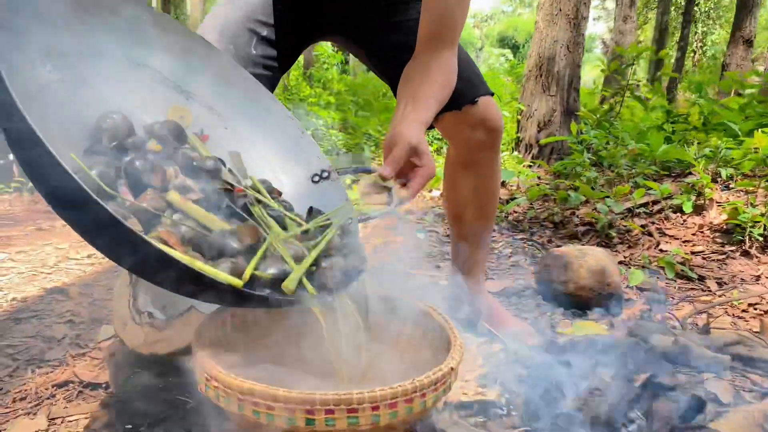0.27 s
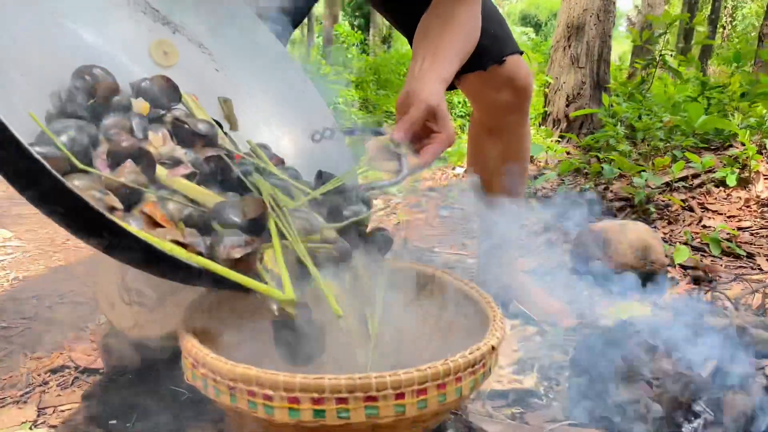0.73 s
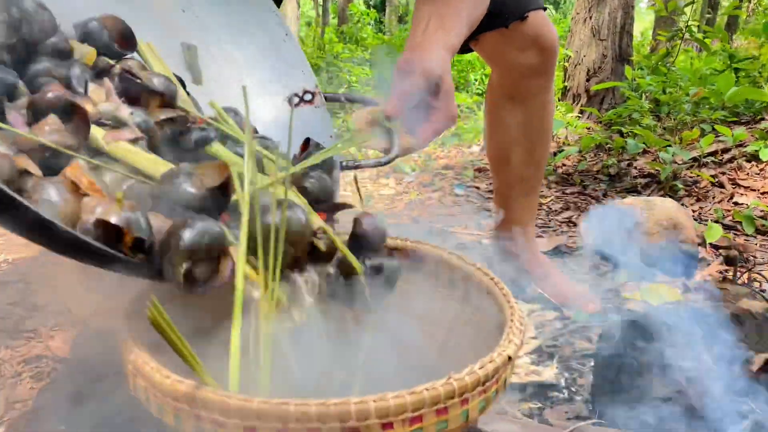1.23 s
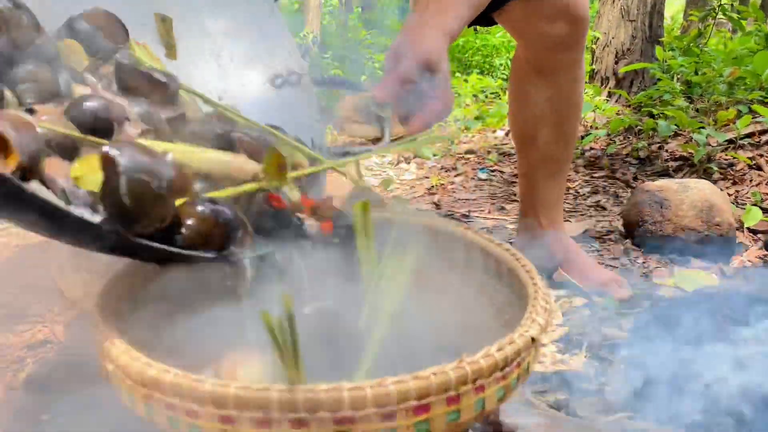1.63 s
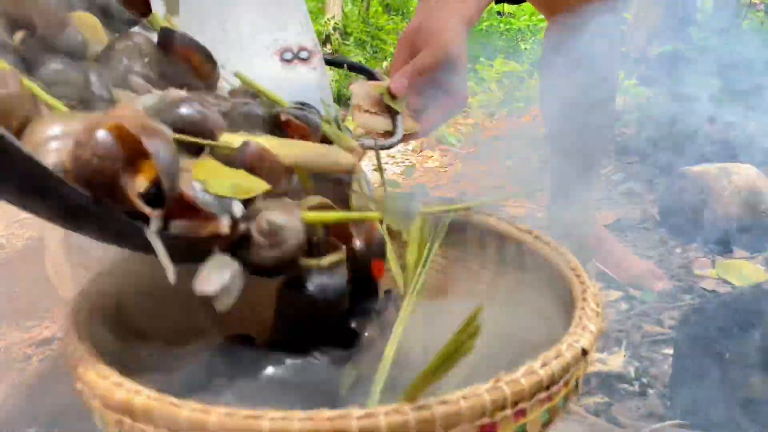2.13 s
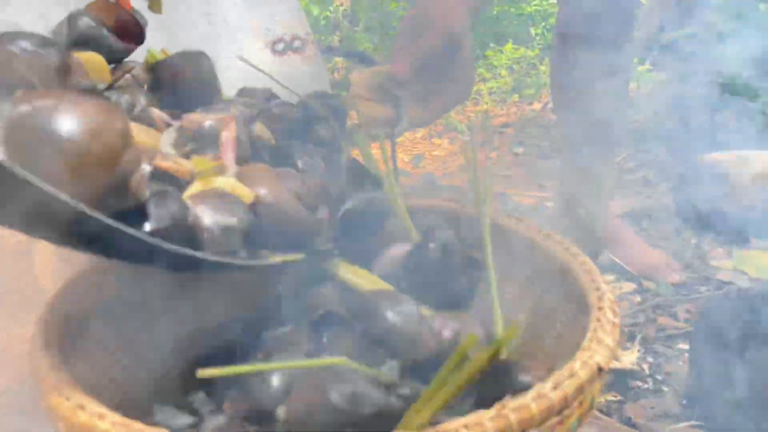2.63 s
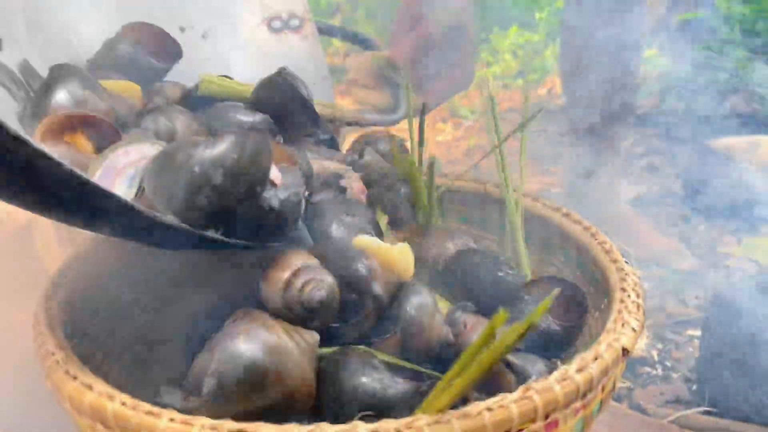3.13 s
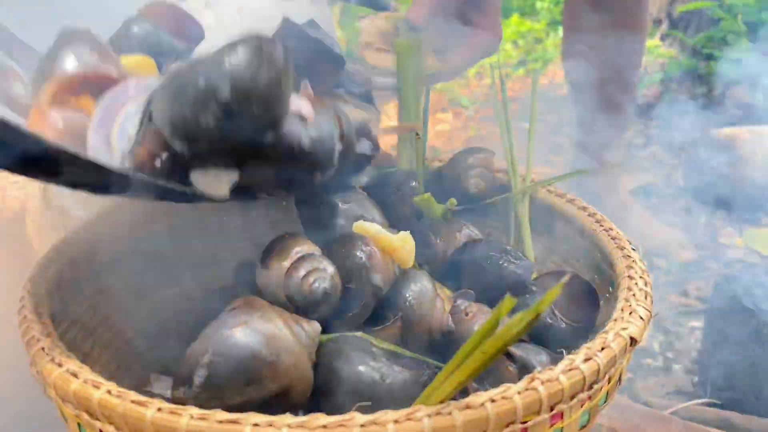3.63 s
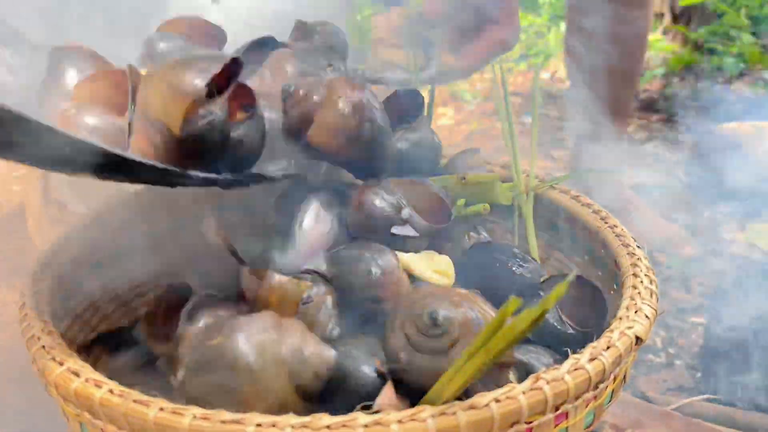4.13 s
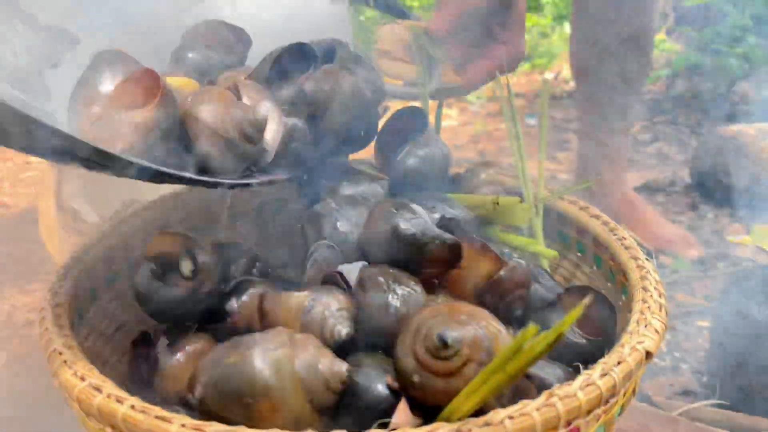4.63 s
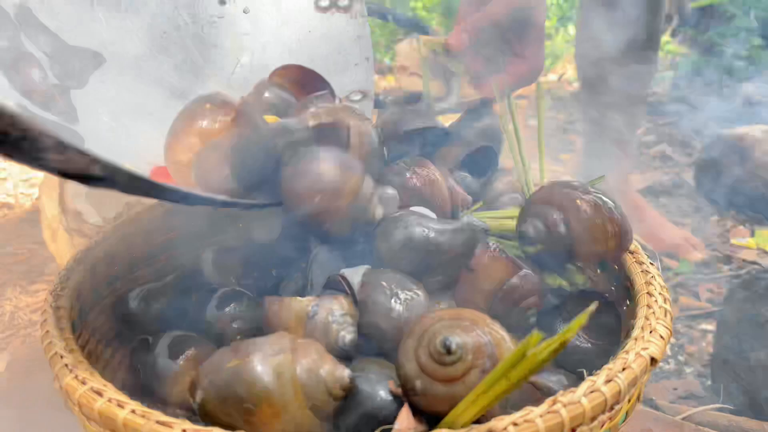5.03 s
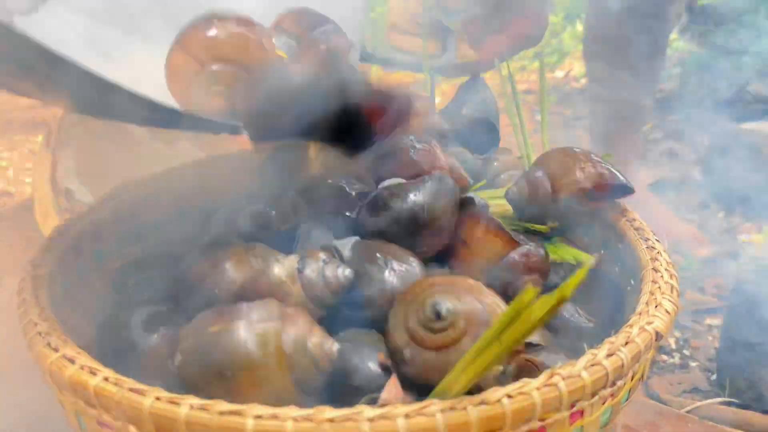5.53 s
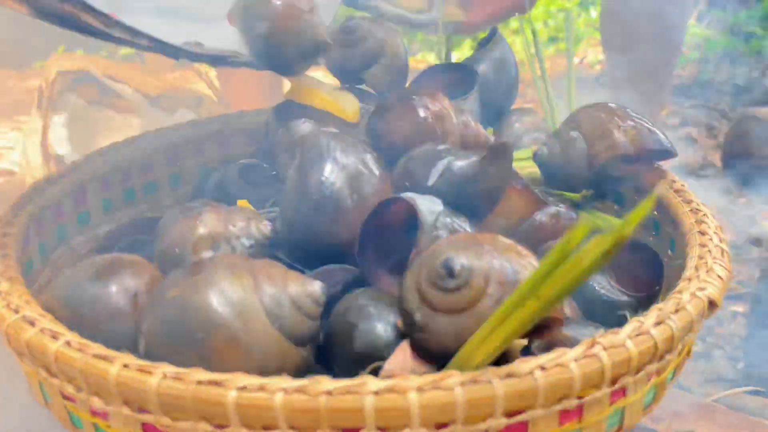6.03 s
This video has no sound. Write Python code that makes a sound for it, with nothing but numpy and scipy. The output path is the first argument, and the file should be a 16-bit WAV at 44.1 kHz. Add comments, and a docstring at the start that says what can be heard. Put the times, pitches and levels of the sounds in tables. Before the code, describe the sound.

Close, dry stereo sound of cooked snail shells being tipped from a metal pan into a woven basket in a wood. At first there is soft broth hiss, light knocks, a very faint metallic pan ring and, around 0.2-0.35 s, one thin rising bird chirp. Firmer hollow clacks begin at 0.55-0.8 s, with low wind puffs until about 2.1 s. A loud cluster tumbles at 1.35-1.75 s while the liquid hiss swells, then strong sliding rushes come at 2.1 and 2.8 s, with busy clatter between. It thins from 3.0 to 3.6 s, bursts sharply at 3.65 s, then rattles on more lightly. Further knocks come at 4.5, 4.85 and 5.0-5.2 s, and brisk clatter from 5.45 to 5.95 s. The knocks turn drier and less boomy as the basket fills, ending with small settling clicks and a last clack near 6.26 s.

```python
"""Cooked snail shells are tipped from a metal pan into a woven basket in a wood.
Each knock is a set of dying resonances and grit; bursts of treble tick alone or on top of knocks.
The heap rattles, and at times slides in a rush, as random contacts ring many resonances.
Broth and steam hiss as shaped noise, wind rumbles as low noise on two spaced microphone ports.
The pan rings at first as narrow wavering noise, and a bird chirps once, a rising sine."""
import sys
import numpy as np
from scipy import signal
from scipy.fft import rfft, irfft
from scipy.io import wavfile

SR = 44100
rng = np.random.default_rng(int(sys.argv[2]) if len(sys.argv) > 2 else 0)


def int16_out(signal):
    """Quantize to a 16-bit WAV file."""
    q = np.round(np.clip(np.atleast_2d(signal).T, -1, 1) * 32767)
    wavfile.write(sys.argv[1], SR, q.astype(np.int16))


def convert_level_to_amplitude(level_db):
    """Map a level in decibels to its linear amplitude factor."""
    exponent = np.asarray(level_db, float) / 20
    return 10 ** exponent


N = 276507

# Restlessness of the heap. Each row: time in seconds, rattle level in dB.
HEAP_RATTLE = [(0, -66), (.44, -57.5), (.7, -44.5), (.85, -75), (1.13, -55), (1.3, -37), (1.55, -51),
               (1.69, -45), (1.9, -63), (2.15, -34), (2.45, -45), (2.58, -40), (2.7, -43.5), (3.1, -42),
               (3.2, -66), (3.5, -70), (3.8, -42.5), (4.19, -44), (4.33, -59), (4.4, -38), (4.55, -35),
               (4.68, -58), (4.8, -34.5), (4.94, -37.5), (5.06, -51), (5.14, -36), (5.26, -56.5),
               (5.43, -59), (5.5, -31), (5.64, -49.5), (5.8, -61), (6.01, -36), (6.15, -59), (6.27, -53)]
# Tone of shell on shell. Each row: frequency in Hz, relative level in dB per Hz.
SHELL_COLOUR = [(150, -15), (300, -19), (650, -14), (900, -7), (1500, -5), (2700, -8), (5000, -8),
                (8500, -7), (11000, -7.5), (17000, -12)]
# Broth running through the weave and steaming. Each row: time in seconds, level in dB.
BROTH_LEVEL = [(0.0, -49), (1.1, -46), (1.6, -37.5), (1.95, -49), (2.25, -39), (3.0, -41.5), (3.3, -52.5),
               (3.85, -47.5), (4.26, -52.5), (5.0, -46), (5.35, -56), (6.27, -52)]
# Tone of broth and steam. Each row: frequency in Hz, relative level in dB per Hz.
HISS_COLOUR = [(90, -34), (150, -6), (560, -13.5), (1900, -14), (3500, -16.5), (6800, -23), (8800, -33.5),
               (11000, -26.5), (17000, -18)]
# Wind strength. Each row: time in seconds, level in dB.
GUST_LEVEL = [(0.0, -52), (0.35, -53), (0.79, -40), (0.8, -44.5), (1.83, -45.5), (1.92, -58), (2.09, -48),
              (2.13, -57), (6.22, -53), (6.27, -52)]
# Tone of the wind. Each row: frequency in Hz, relative level in dB per Hz.
WIND_COLOUR = [(12, -32), (20, -7), (54, 5.5), (82, 3.5), (112, 2), (161, -11.5), (300, -13.5), (390, -5.5),
               (660, -120)]
# Short puffs of wind. Each row: centre in seconds, level in dB.
WIND_PUFFS = [(.77, -36), (1.24, -36), (1.62, -40), (1.71, -37), (1.82, -43), (1.99, -47.5), (2.08, -40),
              (2.85, -49), (3.07, -49), (3.65, -55), (4.35, -54), (4.47, -58), (4.7, -59), (5.26, -55),
              (5.5, -51), (5.59, -46), (5.83, -52), (6.16, -49.5)]
# Sheet metal of the pan. Each row: frequency in Hz, starting level in dB, t60 in seconds.
PAN_MODES = [(1100, -50, .8), (2550, -51, .8)]
# Single shell knocks. Each row: start in seconds, peak level of the wall in dB, cavity pitch in Hz,
# wall pitch in Hz, cavity level relative to the wall in dB.
SHELL_KNOCKS = [(0.0055, -30, 1080, 2520, -27), (0.033, -31, 1130, 2310, -27),
                (0.183, -31, 1450, 5030, -12), (0.196, -24.5, 1450, 1680, -3),
                (0.2482, -34.5, 1520, 1700, 6), (0.2665, -39, 490, 1730, 1), (0.285, -23.5, 1600, 1730, -5),
                (0.3038, -21.5, 1580, 1740, -1.5), (0.5485, -19, 1160, 2040, 3),
                (0.553, -20, 1110, 2120, -3), (0.5903, -24, 476, 2020, -1.5), (0.602, -22, 1100, 4370, -16),
                (0.6175, -9, 1490, 2120, -14), (0.6258, -17, 1530, 2000, -4), (0.64, -38.5, 446, 2000, 12),
                (0.68, -28.0, 1000, 2270, -0.5), (0.7276, -46.5, 1050, 3330, 17),
                (0.7685, -26.5, 820, 3350, -15), (0.7757, -18.5, 1380, 4520, -10),
                (0.7896, -27, 470, 2980, 0.5), (0.852, -47.5, 1080, 2880, 14),
                (0.8779, -37, 1030, 1870, 11.5), (0.9575, -18.5, 1430, 1800, -8),
                (1.0323, -20.5, 887, 4900, 1.5), (1.0623, -21.5, 1520, 1840, -2),
                (1.1, -23, 630, 2080, -11), (1.1816, -13.5, 900, 2370, -19),
                (1.1924, -16.5, 1230, 2420, -20), (1.2261, -9.5, 1235, 3300, -9),
                (1.2846, -25, 1040, 3500, -4), (1.311, -20.5, 830, 4020, -0.5),
                (1.3518, -2.5, 1620, 2910, -3.5), (1.3636, -9, 1200, 2980, -7),
                (1.3713, -7, 1210, 3200, -11), (1.379, -7, 1320, 2980, -4.5),
                (1.389, -7.5, 1260, 5000, -11), (1.4094, -16.5, 1240, 4950, 7),
                (1.4153, -7, 1220, 4800, -15), (1.425, -19, 1050, 1830, 7), (1.4763, -8.5, 1265, 2260, 2.5),
                (1.4915, -10, 990, 3740, -26), (1.5247, -20, 1210, 1770, 3), (1.5498, -19, 805, 1710, 2),
                (1.5523, -25.5, 830, 1750, 3.5), (1.577, -26.0, 864, 1960, 5.5),
                (1.5998, -2.5, 1394, 4360, -10.5), (1.608, -12.5, 830, 4380, -16),
                (1.6303, -13.5, 840, 2680, -4), (1.6372, -21, 828, 1720, 4), (1.6428, -16.5, 830, 3440, -1),
                (1.6548, -14.5, 1210, 1950, 0.5), (1.6647, -6, 1170, 2085, -11.5),
                (1.7002, -18.5, 1170, 1910, -6), (1.7215, -19, 855, 1720, 0),
                (1.7374, -20.5, 1220, 1700, 1.5), (1.7598, -6, 1317, 2710, -5.5),
                (1.7651, -21, 1280, 2050, -10), (1.803, -13.0, 1270, 2380, -6),
                (1.8081, -28, 1280, 2700, 11), (1.8165, -19, 1260, 2680, -4), (1.8492, -27, 890, 3460, -1),
                (1.8627, -12, 1600, 3120, -16), (1.8739, -28, 1600, 3150, -14),
                (1.8932, -25, 624, 3860, -6), (1.9386, -29, 1180, 2730, -5),
                (1.9941, -23.0, 1460, 1750, -11), (2.0671, -7, 1230, 1880, -4), (2.085, -3, 1134, 2380, -4),
                (2.0925, -6, 1200, 2350, -7), (2.1078, -10, 1205, 2400, -2),
                (2.1426, -12.5, 1220, 2080, -15), (2.157, -25, 1174, 2380, -1),
                (2.177, -24.5, 1150, 3480, -2), (2.2061, -17.5, 1180, 2400, -10),
                (2.2379, -13, 1220, 2370, 0.5), (2.2569, -12.5, 1410, 3040, -14),
                (2.265, -11, 1420, 2970, -24), (2.2731, -3.5, 1180, 3260, -15),
                (2.2902, -15.5, 1220, 2340, -7), (2.3013, -18, 1350, 2330, -8),
                (2.337, -21.5, 670, 2540, -7.5), (2.3446, -19.5, 774, 1720, 3),
                (2.3748, -12.5, 1440, 2420, -9), (2.3825, -14.5, 1600, 2260, -2.5),
                (2.411, -20, 1310, 2690, -6), (2.421, -14.5, 1090, 2380, -5), (2.4361, -17, 1086, 3200, 2),
                (2.441, -11.5, 1340, 3260, -16), (2.458, -11, 1010, 3520, -17),
                (2.4866, -16.0, 770, 2030, -22), (2.4973, -18, 1080, 2720, -20),
                (2.5053, -18, 1580, 2710, -18), (2.513, -20.5, 1460, 3210, -19),
                (2.5451, -18.5, 980, 2260, -12), (2.5658, -20, 1070, 2830, -6),
                (2.5696, -18.5, 1000, 2830, -4), (2.5796, -17, 1000, 2780, -13),
                (2.6245, -10, 1090, 4080, -30), (2.6392, -20, 1460, 2070, -15),
                (2.674, -19.0, 1100, 2530, -18), (2.7382, -26, 1450, 3860, -25),
                (2.7793, -23.5, 1100, 3840, -5), (2.8038, -17.5, 1040, 3090, -1),
                (2.8182, -8.0, 1060, 2370, -1.5), (2.8264, -2.5, 1053, 2250, -2.5),
                (2.8405, -2.5, 1030, 2410, -11), (2.8447, -0.5, 1040, 2680, -13),
                (2.862, -15, 1230, 1830, -13), (2.8682, -12, 1200, 1900, -8), (2.887, -15, 1250, 1930, -7),
                (2.9138, -19, 1510, 3980, -15), (2.9721, -12, 1500, 2520, -29),
                (2.995, -27, 823, 3930, 0.5), (3.02, -21.5, 800, 3470, -12), (3.0386, -15, 1395, 1720, 1.5),
                (3.0606, -20.5, 713, 2350, -5), (3.1165, -19.5, 1580, 2510, -9),
                (3.131, -16, 1020, 2470, -11), (3.189, -25.5, 1600, 2900, -12),
                (3.1996, -24, 1600, 2190, -21), (3.2746, -19, 760, 2150, -11), (3.32, -37, 1600, 2940, -14),
                (3.4518, -23.5, 1020, 2750, -8), (3.4833, -28.5, 1600, 2350, -14),
                (3.6113, -20.5, 1160, 2350, -13), (3.6286, -15, 1060, 3070, -7),
                (3.6411, -1.0, 1170, 2700, -14), (3.6524, -8, 684, 2330, -14),
                (3.659, -10.5, 750, 2626, -24), (3.6696, -31, 1030, 2790, -18),
                (3.689, -10.5, 1080, 2900, -33), (3.7057, -23, 1440, 2510, -12),
                (3.754, -26.5, 970, 1770, -1), (3.7768, -18.5, 760, 2500, -10),
                (3.791, -20, 1120, 2820, -10), (3.8137, -18, 766, 2690, -20), (3.8305, -21, 760, 3600, -18),
                (3.8655, -11.5, 1160, 2620, -25), (3.8727, -19, 1170, 3640, -8),
                (3.8774, -15.5, 1600, 3620, -20), (3.8997, -20.5, 1030, 2700, -23),
                (3.9233, -19.5, 1020, 3650, -35), (3.9554, -26, 1070, 2700, -15),
                (3.9806, -15.0, 880, 2800, -16.5), (4.0049, -22, 1030, 3080, -25),
                (4.024, -20.5, 1420, 2140, -16), (4.0607, -13, 1620, 2030, -2),
                (4.078, -18, 1600, 3980, -7), (4.0944, -13.5, 830, 4450, -14),
                (4.1065, -21, 1210, 1950, -17), (4.134, -27.5, 1000, 4330, -6),
                (4.1556, -26.5, 1560, 3360, -1), (4.1594, -21.5, 1390, 2940, 0),
                (4.2027, -27, 1270, 3870, -4), (4.2367, -31, 1000, 2400, -5), (4.2695, -35.5, 820, 3580, 1),
                (4.3346, -31, 1450, 4880, -8), (4.3509, -34.0, 820, 3840, 0), (4.3911, -24, 760, 2310, -9),
                (4.4147, -16.5, 1160, 3770, -21), (4.4426, -29, 1420, 4600, -22),
                (4.473, -20.5, 800, 2710, -22), (4.4958, -16, 1610, 3230, -31),
                (4.5108, -4.5, 1020, 3770, -15.5), (4.5172, -16, 1050, 3850, -12),
                (4.5519, -23, 1480, 3960, -19), (4.56, -9.5, 1600, 3830, -25),
                (4.5704, -16, 1230, 3800, -10), (4.5961, -23.0, 1420, 3230, -20),
                (4.6089, -21, 790, 2080, -6.5), (4.703, -13, 1350, 3570, -7.5), (4.714, -20, 820, 2850, -8),
                (4.7324, -33, 1060, 3810, 7), (4.7524, -17, 820, 3130, -16),
                (4.7643, -24.0, 1600, 1700, -6), (4.7735, -19.5, 1470, 2140, -16),
                (4.8375, -10.5, 1430, 3260, -2), (4.868, -17, 1030, 3050, -4),
                (4.8844, -18.0, 1360, 3350, -5), (4.9178, -12.5, 1060, 3960, -13),
                (4.9306, -13, 1450, 3960, -18), (4.9424, -21.5, 1320, 3620, -24),
                (5.0126, -10, 1310, 3070, -4), (5.0193, -18, 710, 3040, -11), (5.0336, -22, 1320, 3840, -2),
                (5.0438, -19.5, 1324, 2580, 3), (5.0545, -16.0, 1000, 3800, -4),
                (5.1137, -13.0, 1310, 4210, -22), (5.129, -8.5, 1540, 3860, -35),
                (5.1348, -18, 1480, 4000, -25), (5.1388, -23, 1410, 2750, -12),
                (5.1588, -24.5, 790, 2920, -6), (5.1751, -13.5, 1480, 4050, -24),
                (5.191, -25, 1030, 4540, -4), (5.215, -29, 860, 3600, -8), (5.2316, -25, 1130, 3880, -5),
                (5.254, -24, 834, 1850, 0.5), (5.293, -22, 1570, 2350, -5), (5.3032, -26, 1360, 3130, -7),
                (5.331, -37.5, 880, 1830, 7.5), (5.3853, -35, 840, 3280, 0.5),
                (5.4433, -16, 1140, 3200, -20), (5.4484, -7.5, 1230, 3280, -20),
                (5.4698, -13.5, 1110, 2800, -4), (5.4802, -25, 1410, 2910, -8), (5.49, -25, 1600, 2820, -3),
                (5.5064, -10, 990, 2700, -8.5), (5.5258, -18.5, 1310, 3210, -5),
                (5.5495, -16, 1410, 3470, -8), (5.5556, -25, 1600, 2130, -13),
                (5.5713, -7.5, 834, 3137, -11), (5.5756, -24, 865, 3150, -1),
                (5.5859, -22.5, 1070, 5100, -15), (5.5906, -25, 1280, 2010, -13),
                (5.5976, -25, 1400, 3190, -18), (5.6418, -9.5, 1380, 4100, -24.5),
                (5.6519, -26.5, 786, 2530, -4.5), (5.6998, -23.5, 1060, 2200, -6),
                (5.729, -24, 870, 5030, -11), (5.7354, -11.0, 1030, 3140, -22),
                (5.7415, -5.0, 1090, 3140, -27), (5.7629, -18.5, 1350, 2560, -13),
                (5.7879, -21, 1540, 2950, -9), (5.795, -20.5, 1310, 2900, -15),
                (5.805, -22.5, 1180, 3160, -17), (5.8625, -9, 1340, 4960, -5.5),
                (5.8792, -12, 814, 2790, -2.5), (5.9458, -8.5, 1050, 3030, -19),
                (5.961, -15, 1460, 2950, -6), (5.98, -15, 1590, 3390, -8), (6.007, -21, 1290, 3300, -9),
                (6.029, -20, 1380, 2510, -7), (6.0893, -21.5, 1520, 3500, -23), (6.1, -26, 1310, 3440, -24),
                (6.124, -18.0, 1390, 3300, -5.5), (6.132, -21, 1390, 3520, -17),
                (6.18, -26, 1400, 3170, -7), (6.2311, -28, 750, 3000, -5), (6.2367, -21.5, 1000, 3090, -11),
                (6.2625, -11, 920, 5030, -16)]
# Basket resonances. Each row: frequency in Hz, relative level in dB, t60 in seconds.
BASKET_MODES = [(180, -2, 0.032), (334, -8, 0.065), (420, -0.5, 0.045), (574, -5, 0.057)]
# Bursts of treble, alone or on top of knocks. Each row: start in seconds, peak level in dB.
TREBLE_TICKS = [(0.1828, -30), (0.5087, -33), (0.5197, -33), (0.5468, -27), (0.6254, -25), (0.6953, -35),
                (0.7693, -25), (0.7905, -30), (0.957, -27.5), (1.0348, -26), (1.229, -15.5), (1.2857, -36),
                (1.3336, -32), (1.3893, -11.5), (1.4027, -30), (1.5246, -30), (1.6084, -18), (1.6227, -29),
                (1.6579, -26), (1.6994, -30), (1.71, -28), (1.7294, -21), (1.8929, -33), (2.0888, -6),
                (2.1559, -28), (2.1629, -33), (2.1845, -25), (2.1946, -33), (2.227, -27), (2.265, -17),
                (2.3166, -22), (2.3316, -28), (2.339, -28), (2.4344, -20), (2.4939, -25), (2.5454, -22),
                (2.5796, -19.5), (2.6059, -38), (2.623, -10), (2.6443, -36), (2.6737, -28), (2.723, -23),
                (2.7374, -25), (2.8188, -6), (2.8274, -12), (2.8533, -18), (2.9094, -33), (3.0876, -34),
                (3.108, -24), (3.123, -31), (3.132, -24.5), (3.6476, -9), (3.6588, -11), (3.6888, -9.5),
                (3.7372, -30), (3.7874, -33), (3.7981, -31), (3.814, -28), (3.8715, -25), (3.8972, -32),
                (3.9044, -34), (3.9888, -35), (3.9959, -24), (4.0046, -29), (4.0777, -25), (4.129, -27),
                (4.1445, -21), (4.1545, -33), (4.1632, -24), (4.237, -30), (4.3317, -32), (4.4049, -33),
                (4.4463, -31), (4.4609, -34), (4.472, -17), (4.48, -31), (4.496, -17), (4.5107, -11.5),
                (4.5289, -17), (4.5517, -25), (4.592, -31), (4.6083, -35), (4.6508, -27), (4.7645, -31),
                (4.7718, -28), (4.81, -32), (4.818, -30), (4.839, -19), (4.883, -27), (4.8947, -28),
                (4.9185, -22), (4.94, -26), (5.0308, -31), (5.0789, -34), (5.1153, -29), (5.1927, -20),
                (5.231, -33), (5.2574, -30), (5.2917, -32), (5.3134, -35), (5.508, -14), (5.5494, -8),
                (5.5709, -14), (5.5822, -14.5), (5.5954, -27), (5.6114, -35), (5.6563, -25), (5.7012, -29),
                (5.7359, -11.5), (5.796, -21), (5.8048, -28), (5.863, -18), (5.88, -17), (5.9486, -17),
                (6.029, -29), (6.09, -25), (6.0989, -38), (6.125, -21.5)]
# The bird's whistle. Each row: time in seconds, pitch in Hz, level in dB.
BIRD_CHIRP = [(.205, 4900, -66), (.225, 5350, -62), (.24, 5780, -61), (.27, 5950, -66), (.36, 6000, -70)]
# Many shells sliding at once. Each row: time of full strength in seconds, swell in seconds,
# hold in seconds, peak level in dB, cavity pitch in Hz.
SHELL_SLIDES = [(0.551, 0.012, .004, -36, 1114), (0.771, 0.0068, 0.0036, -31, 1140),
                (1.348, 0.024, .04, -24, 1197), (1.64, .018, .005, -37, 960),
                (2.082, 0.036, .012, -16, 1173), (2.247, 0.02, 0.031, -32, 1130),
                (2.822, 0.042, 0.025, -16, 1042), (3.641, 0.037, 0.0051, -14.5, 1067),
                (4.447, 0.13, .03, -37.5, 1047), (4.838, 0.02, 0.0092, -22, 1250),
                (5.013, 0.0081, .035, -29.5, 1070), (5.546, .006, 0.034, -29, 980),
                (5.862, 0.0052, 0.022, -23.5, 1047)]
# Top end of the microphone. Each row: frequency in Hz, gain in dB.
MICROPHONE_TOP = [(11800, 0), (12600, -17), (13500, -25), (15200, -10.5), (16000, -14), (17000, -45)]

HOLLOW_DB, HOLLOW_DB_PER_S = 1, -0.88   # the rattle sounds less hollow as the basket fills
STIR_DB, STIR_T60_S = -14, 0.12   # every knock stirs the heap for a moment
PUFF_S, GUST_WANDER_DB = 0.023, 1.5   # half-width of a puff; spread of the wind level
CAVITY_T60_S, WALL_T60_S, CRACK_T60_S = 0.044, 0.021, 0.02   # typical: each varies by chance
CONTACT_S = 0.00047   # typical time for contact to build
CRACK_DB, CRACK_SPREAD_DB = -17, 3   # crack relative to the wall, and its chance spread
BASKET_DB, BASKET_DB_PER_S = -11.5, -6   # basket relative to the knock, less as it fills
TICK_T60_S = 0.025
SWELL_DB, FADE_DB_PER_S = -26, -600   # depth of a rush one swell time before full; its fade
SLIDE_S = 0.05   # after the hold, a rush starts to close here and is shut at twice this
SLIDE_HOLLOW_DB, SLIDE_BRIGHT_DB = -8, -13.5   # cavities and treble relative to the middle
LEAN_DB, LEAN_DB_PER_S, LEAN_WANDER_DB = 1.5, 0.34, 0.96   # the heap grows towards the left port
PORT_LAG_S = 0.0002896   # basket sound reaches the right port later


def rms_one(x):
    """Scale to unit rms."""
    return x / np.sqrt(np.mean(x ** 2) + 1e-20)


def in_time(rows):
    """Draw each column after the time as a curve, sample by sample."""
    s, *columns = np.transpose(rows)
    return [np.interp(np.arange(N) / SR, s, column) for column in columns]


def colour(x, points):
    """Tilt the spectrum along the last axis; phases stay."""
    hz = np.maximum(np.fft.rfftfreq(x.shape[-1], 1 / SR), 1)
    point_hz, point_db = np.array(points).T
    db = np.interp(np.log(hz), np.log(point_hz), point_db)
    return irfft(rfft(x) * convert_level_to_amplitude(db), x.shape[-1])


def band(x, low_hz, high_hz):
    """Steep band-pass."""
    sos = signal.butter(3, [low_hz, high_hz], "band", fs=SR, output="sos")
    return signal.sosfilt(sos, x)


def drift(rate_hz):
    """Slow random wander of unit rms."""
    r = np.exp(-2 * np.pi * rate_hz / SR)
    wander = signal.lfilter([1], [1, -2 * r, r * r], rng.standard_normal(N + SR))
    return rms_one(wander[SR:])


def rings(hz, t60, t):
    """Dying sines, one row per pitch."""
    return np.sin(2 * np.pi * hz[:, None] * t) * convert_level_to_amplitude(-60 * t / t60)


def clatter(per_s, spread_db, cycles, unlike):
    """Random contacts dealt to many shell resonances; returns hollow, middle and bright parts."""
    born = rng.random(N) < per_s / SR
    strength = convert_level_to_amplitude(spread_db * np.minimum(rng.exponential(1, N), 4))
    clicks = born * strength * rng.choice([-1, 1], N) + 1e-18
    pitches = np.geomspace(450, 12000, 22)
    dealt, out = rng.integers(0, 4, N), np.zeros((2, N))
    for k, hz in enumerate(pitches):      # every contact reaches a quarter of the resonances
        r, w = convert_level_to_amplitude(-60 * hz / (cycles * SR)), 2 * np.pi * hz / SR
        strike = clicks * (dealt == k % 4) * (1 + unlike * rng.standard_normal((2, N)))
        ringing = signal.lfilter([np.sin(w)], [1, -2 * r * np.cos(w), r * r], strike)
        out += np.sqrt((1 - r) * hz) * ringing
    out = colour(out, SHELL_COLOUR)
    return [rms_one(band(out, low, high)) for low, high in ((193, 1960), (2200, 5460), (7760, 16700))]


def rattle(blows):
    """Small contacts inside the heap, coming in clumps and after every knock."""
    hollow, middle, bright = clatter(per_s=800, spread_db=5.0, cycles=16.3, unlike=1.0)
    r = convert_level_to_amplitude(-120 / (STIR_T60_S * SR))      # decay of power, so twice the dB
    stirred = signal.lfilter([1 - r], [1, -r], np.mean(blows ** 2, axis=0))
    level = np.sqrt(convert_level_to_amplitude(in_time(HEAP_RATTLE)[0]) ** 2 + convert_level_to_amplitude(STIR_DB) ** 2 * stirred)
    clumps = convert_level_to_amplitude(3.53 * drift(34.0))
    hollow_db = HOLLOW_DB + HOLLOW_DB_PER_S * np.arange(N) / SR + 2.8 * drift(2.7)
    return level * clumps * (convert_level_to_amplitude(hollow_db) * hollow + middle + convert_level_to_amplitude(-19.5) * bright)


def hiss():
    """Broth and steam: soft flickering noise, shared by the ports in the bass."""
    white = rng.standard_normal(N) + 1.3 * band(rng.standard_normal((2, N)), 520, 21800)
    flicker_db = 1.5 * drift(8)
    return convert_level_to_amplitude(in_time(BROTH_LEVEL)[0] + flicker_db) * rms_one(colour(white, HISS_COLOUR))


def wind():
    """Lumpy low noise, partly its own at each port, with short puffs on top."""
    white = rng.standard_normal(N) + 0.9 * rng.standard_normal((2, N))
    t = np.arange(N) / SR
    puffs = sum(convert_level_to_amplitude(db) * np.exp(-((t - s) / PUFF_S) ** 2) for s, db in WIND_PUFFS)
    level = convert_level_to_amplitude(in_time(GUST_LEVEL)[0] + GUST_WANDER_DB * drift(6)) + puffs
    return level * rms_one(band(colour(white, WIND_COLOUR), 31, 367))


def pan_ring():
    """Wavering rings of the sheet metal, narrow noise damped as the load shifts."""
    t = np.arange(N) / SR
    damped = np.clip((0.19 - t) / 0.05, 0, 1)
    out = np.zeros(N)
    for hz, db, t60 in PAN_MODES:
        waver = rms_one(band(rng.standard_normal(N), hz - 25, hz + 25))
        out += convert_level_to_amplitude(db - 60 * t / t60) * waver
    return damped * out


def knocks():
    """As contact builds it sets off wall modes, the cavity, a gritty crack and the basket; two ports."""
    s, peak_db, cavity_hz, wall_hz, cavity_db = np.transpose(SHELL_KNOCKS)
    t = np.arange(1792) / SR
    luck = rng.standard_normal((len(s), 24))      # each column is one way in which knocks differ

    noise = colour(rng.standard_normal((len(s), 3, len(t))) ** 3, SHELL_COLOUR)      # many tiny contacts
    grit = rms_one(noise[:, :1] + 0.39 * noise[:, 1:]).swapaxes(0, 1)      # ports, knocks, time
    settle = convert_level_to_amplitude(-13.0 - 60 * t / 0.055)      # the shell rocks on after the blow
    grit = grit * (convert_level_to_amplitude(-60 * t / (CRACK_T60_S * convert_level_to_amplitude(1.2 * luck[:, 5:6]))) + settle)

    wall_t60 = WALL_T60_S * convert_level_to_amplitude(2.9 * luck[:, :1])
    wall = rings(wall_hz, wall_t60, t) + convert_level_to_amplitude(-4) * band(grit, 1870, 4510)
    for k in range(3):      # lesser modes around the main one, radiated unevenly to the two ports
        hz = np.clip(wall_hz * convert_level_to_amplitude(2.5 * luck[:, 2 + k]), 1500, 7000)
        port_db = -11 + 2 * luck[:, [8 + k, 12 + k]].T
        wall += rings(hz, 0.015, t) * convert_level_to_amplitude(port_db)[:, :, None]

    cavity_t60 = CAVITY_T60_S * convert_level_to_amplitude(0.87 * luck[:, 1:2])
    cavity = rings(cavity_hz, cavity_t60, t) + convert_level_to_amplitude(3.5) * band(grit, 377, 1520)
    crack = band(grit, 6540, 17300)
    weave = np.zeros((len(s), len(t)))
    for k, (hz, db, t60) in enumerate(BASKET_MODES):
        mode = rings(hz * convert_level_to_amplitude(0.22 * luck[:, 16 + k]), t60, t)
        weave += mode * convert_level_to_amplitude(db + 3.5 * luck[:, 20 + k, None])

    build = 1 - np.exp(-(t / (CONTACT_S * convert_level_to_amplitude(2.0 * luck[:, 6:7]))) ** 2)
    crack_db = CRACK_DB + CRACK_SPREAD_DB * luck[:, 11]
    basket_db = BASKET_DB + BASKET_DB_PER_S * s
    levels = peak_db + np.array([np.zeros(len(s)), cavity_db, crack_db, basket_db])
    both = 0
    for part, level_db in zip((wall, cavity, crack, np.array([weave, weave])), levels):
        part = part * build
        peak = np.abs(part).max(axis=(0, 2))
        both = both + part * (convert_level_to_amplitude(level_db) / peak)[:, None]

    out = np.zeros((2, N + 2 * len(t)))
    place_s = np.clip(0.00004 * luck[:, 7], -0.0001, 0.0001)      # each shell lies elsewhere: the lag varies
    for side, when in enumerate((s, s + place_s)):
        for k, at in enumerate(np.round(when * SR).astype(int)):
            out[side, at:at + len(t)] += both[side, k]
    return band(out[:, :N], 138, 17000)


def nearby(x):
    """Basket, pan and ground send back a short dull smear."""
    t = np.arange(SR // 8) / SR
    smear = band(rng.standard_normal((2, len(t))), 370, 5030)
    smear = smear * convert_level_to_amplitude(-60 * t / 0.036) * (t > 0.0015)
    smear = smear / np.sqrt(np.sum(smear ** 2) / 2)
    return signal.fftconvolve(x, smear, axes=1)[:, :N]


def ticks():
    """Short gritty bursts of treble, alone or on top of knocks, nearly alike at both ports."""
    t = np.arange(1024) / SR
    grit = rng.standard_normal((len(TREBLE_TICKS), 3, len(t))) ** 3
    ports = grit[:, :1] + 0.35 * grit[:, 1:]
    bursts = band(ports * convert_level_to_amplitude(-60 * t / TICK_T60_S), 4800, 13900)
    out = np.zeros((2, N + len(t)))
    for (s, peak_db), burst in zip(TREBLE_TICKS, bursts):
        at = int(s * SR)
        out[:, at:at + len(t)] += burst * convert_level_to_amplitude(peak_db) / np.abs(burst).max()
    return out[:, :N]


def bird():
    """One thin rising whistle: a sine of gliding pitch and unsteady level."""
    hz, level_db = in_time(BIRD_CHIRP)
    t = np.arange(N) / SR
    start_s, end_s = BIRD_CHIRP[0][0], BIRD_CHIRP[-1][0]
    gate = np.clip(np.minimum(t - start_s, end_s - t) / 0.015, 0, 1)
    return gate * convert_level_to_amplitude(level_db + 2.7 * drift(40)) * np.sin(2 * np.pi * np.cumsum(hz) / SR)


def slides():
    """A rush is a dense clatter that swells, holds and dies fast; the largest cavity hoots along."""
    hollow, middle, bright = clatter(per_s=3500, spread_db=2.5, cycles=16.7, unlike=1.0)
    waver = drift(14.0) + 1j * drift(14)      # a resonance kept going by random blows
    out, t = np.zeros((2, N)), np.arange(N) / SR
    for full_s, swell_s, hold_s, peak_db, cavity_hz in SHELL_SLIDES:
        before = np.maximum(full_s - t, 0) / swell_s      # in swell times
        after = np.maximum(t - full_s - hold_s, 0)      # in seconds
        gate = np.clip(np.minimum(2 - before, 2 - after / SLIDE_S), 0, 1)
        level_db = peak_db + SWELL_DB * before + FADE_DB_PER_S * after
        level = gate * convert_level_to_amplitude(np.maximum(level_db, -200))
        hoot = (waver * np.exp(2j * np.pi * cavity_hz * t)).real
        low = convert_level_to_amplitude(SLIDE_HOLLOW_DB) * (convert_level_to_amplitude(-1.5) * hollow + hoot)
        out += level * (low + middle + convert_level_to_amplitude(SLIDE_BRIGHT_DB) * bright)
    return out


def scene():
    """Shells and pan lean with the heap; with the hiss they arrive late at the right port."""
    lean_db = LEAN_DB + LEAN_DB_PER_S * np.arange(N) / SR + LEAN_WANDER_DB * drift(5.6)
    blows = knocks()
    shells = blows + ticks() + rattle(blows) + slides() + pan_ring()
    shells = shells + convert_level_to_amplitude(-16) * nearby(shells)
    basket = shells * convert_level_to_amplitude(np.outer([0.5, -0.5], lean_db)) + hiss()
    late = np.exp(-2j * np.pi * np.fft.rfftfreq(N, 1 / SR) * PORT_LAG_S)
    basket[1] = irfft(rfft(basket[1]) * late, N)
    return basket + wind() + bird()


def band_limit(x):
    """A steep low-pass at the top of the band."""
    return signal.sosfilt(signal.butter(12, 17130, fs=SR, output="sos"), x)


def record(dry):
    """The capsule loses the top, then peaks are softly rounded."""
    capsule = colour(dry, MICROPHONE_TOP)
    rounded = 1.222 * np.tanh(capsule / 1.237)
    return band_limit(rounded)


dry = scene()
out = record(dry)
int16_out(out)
```